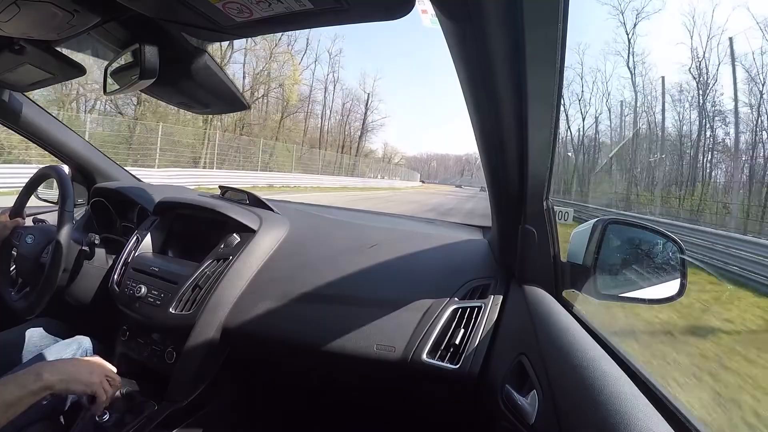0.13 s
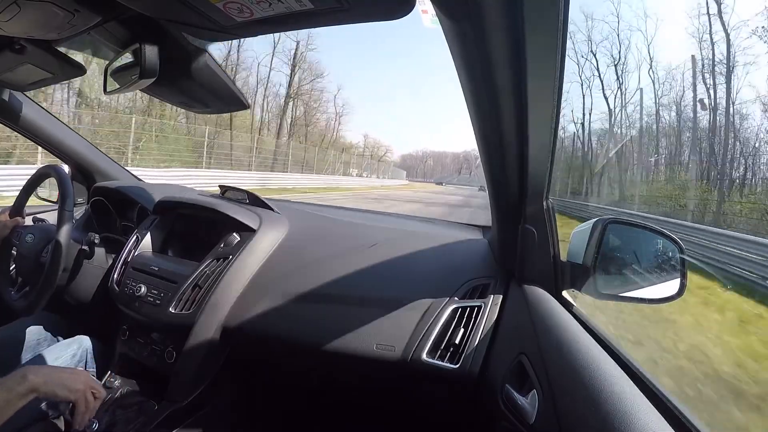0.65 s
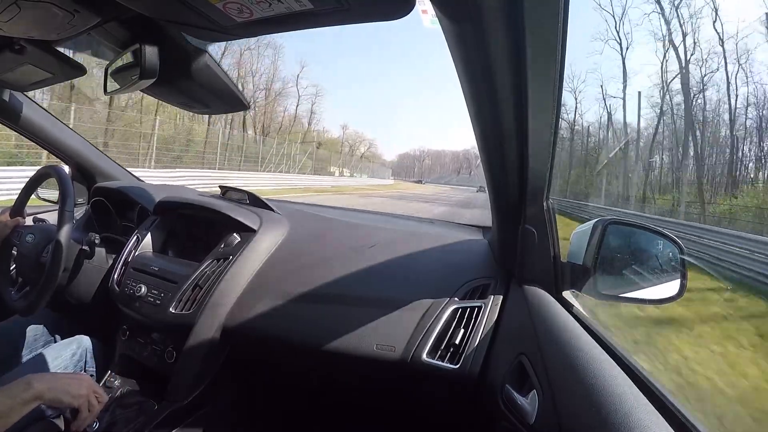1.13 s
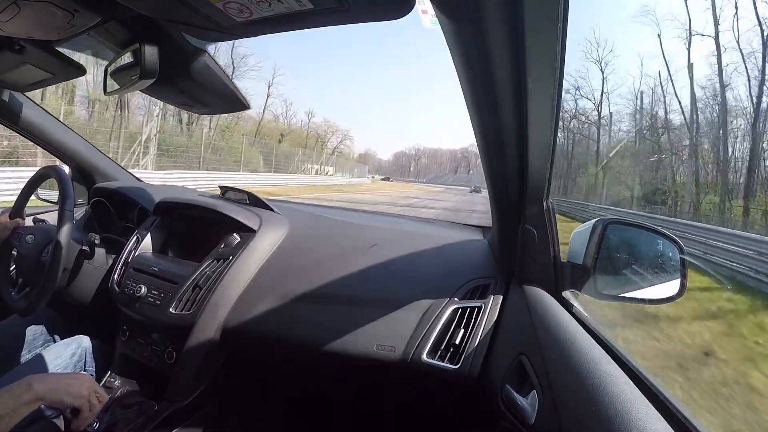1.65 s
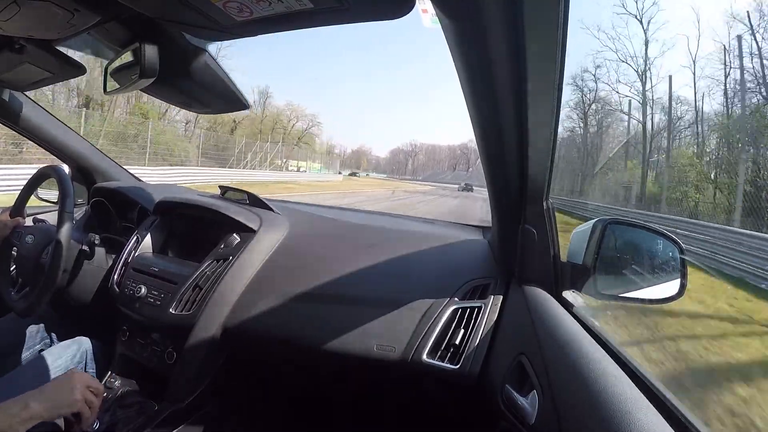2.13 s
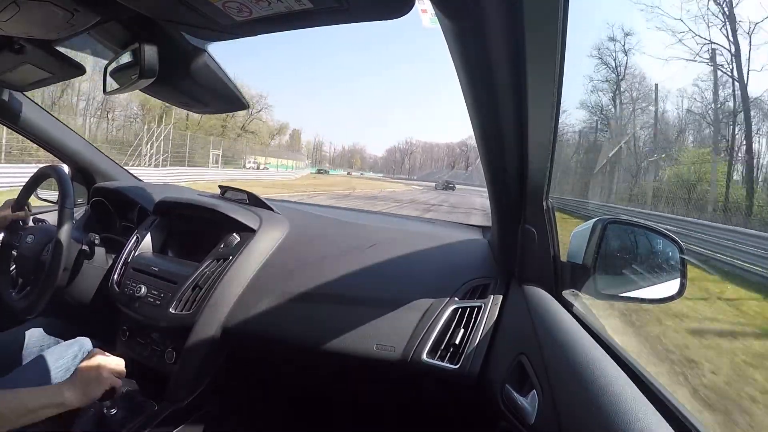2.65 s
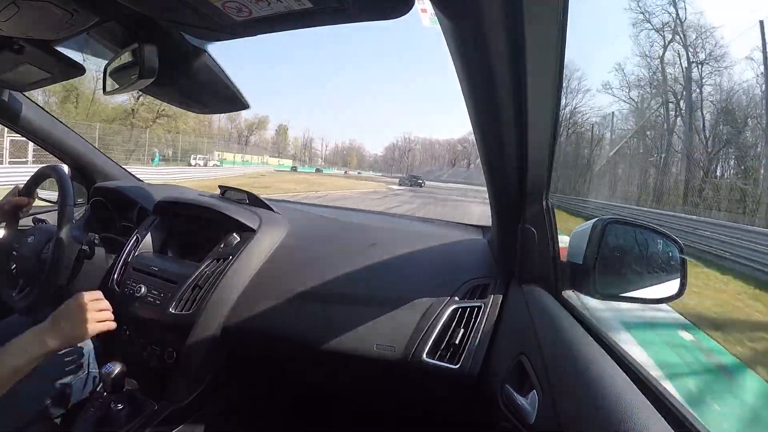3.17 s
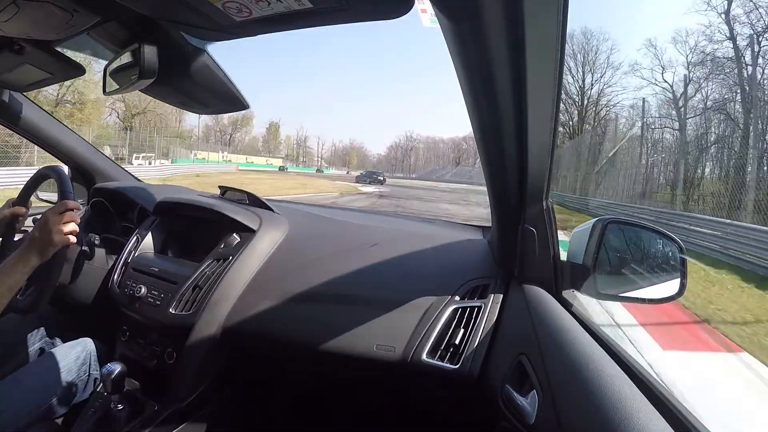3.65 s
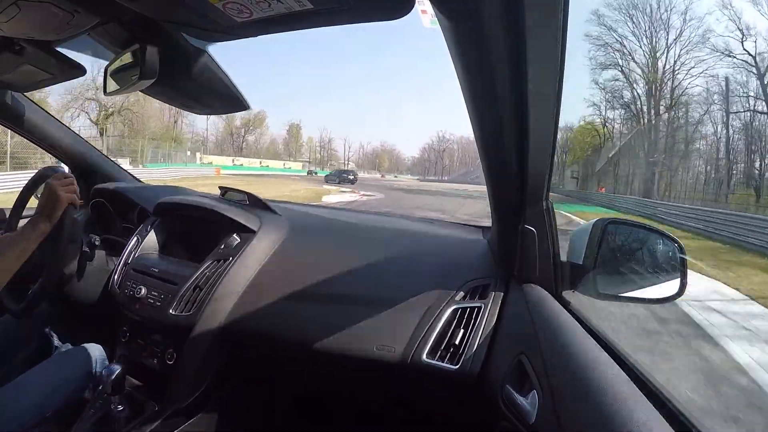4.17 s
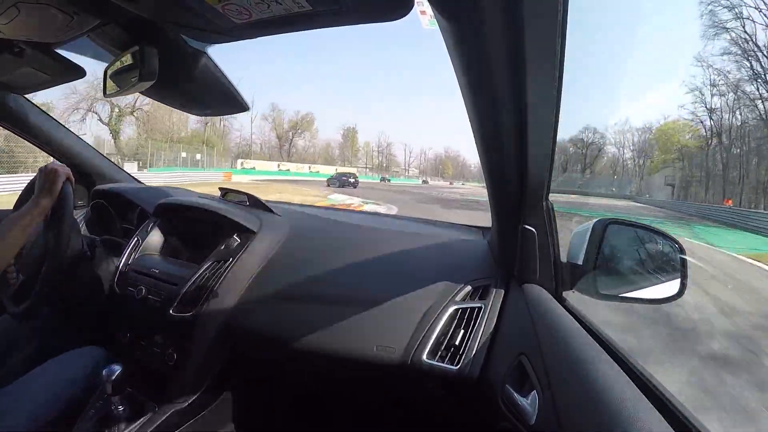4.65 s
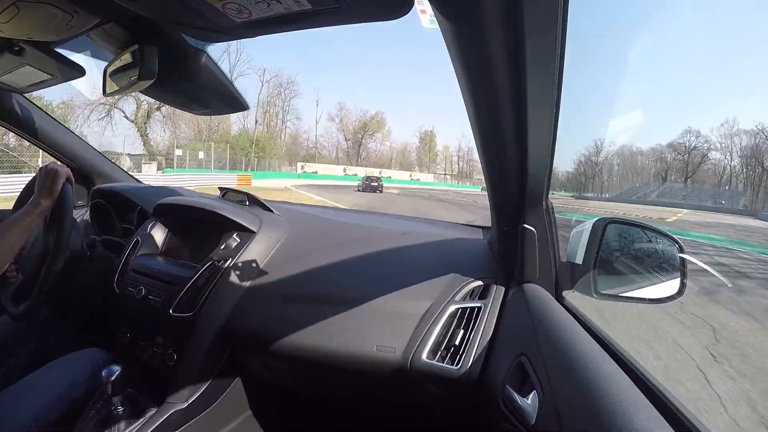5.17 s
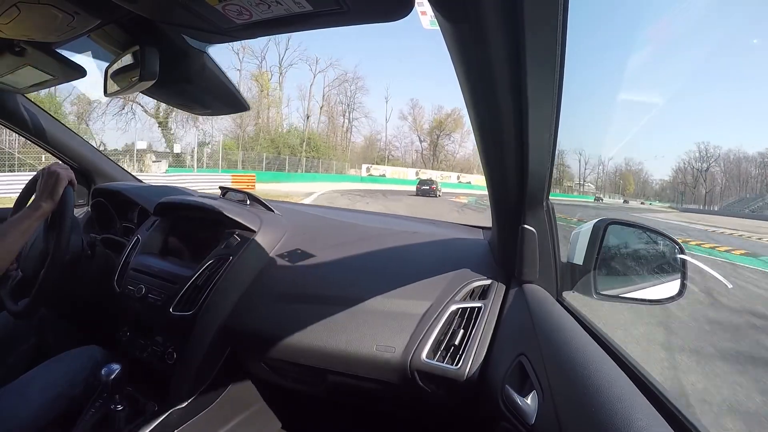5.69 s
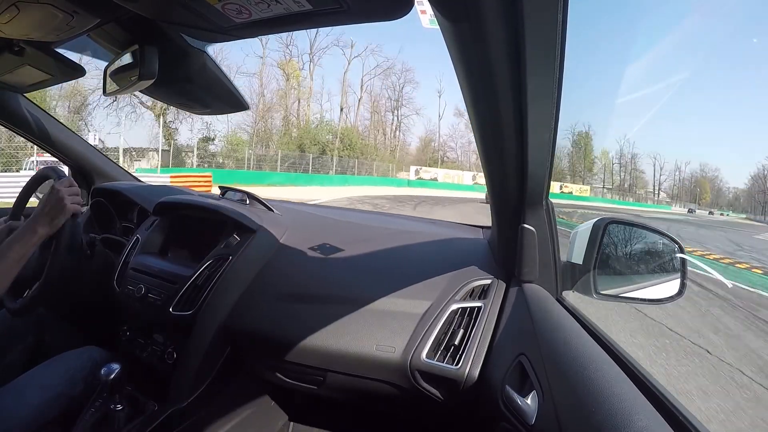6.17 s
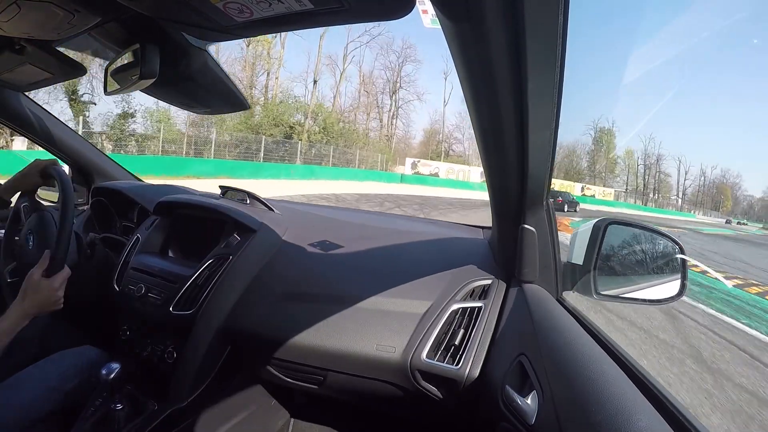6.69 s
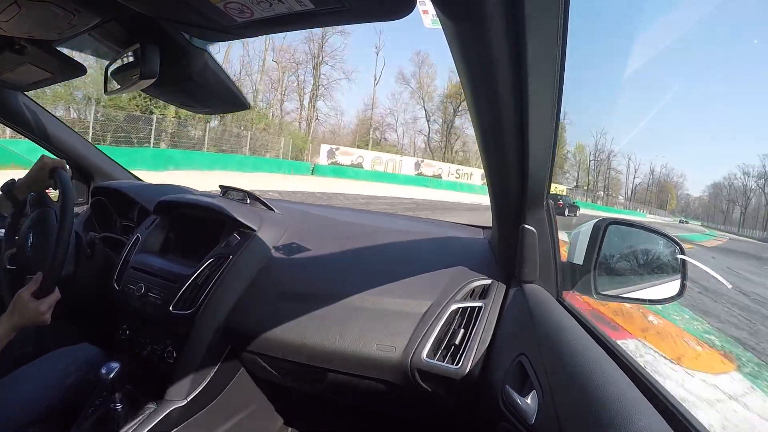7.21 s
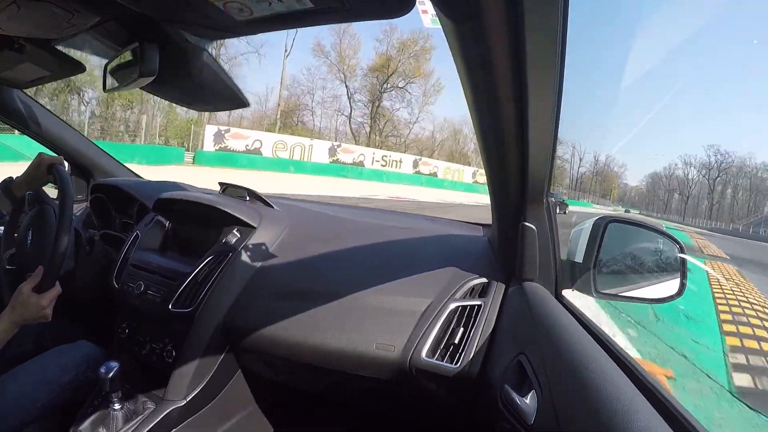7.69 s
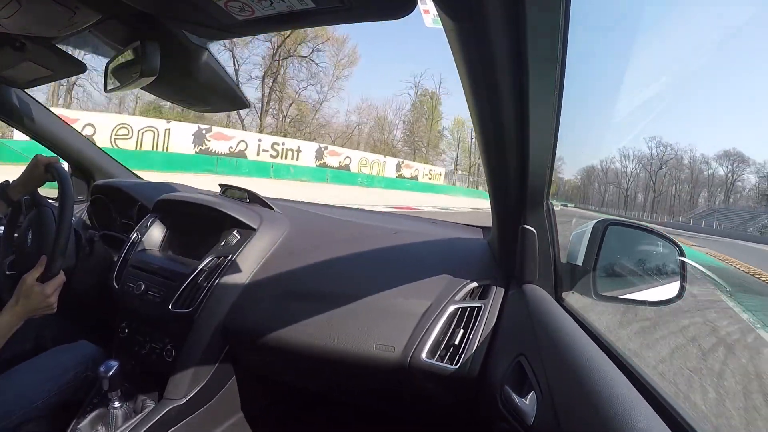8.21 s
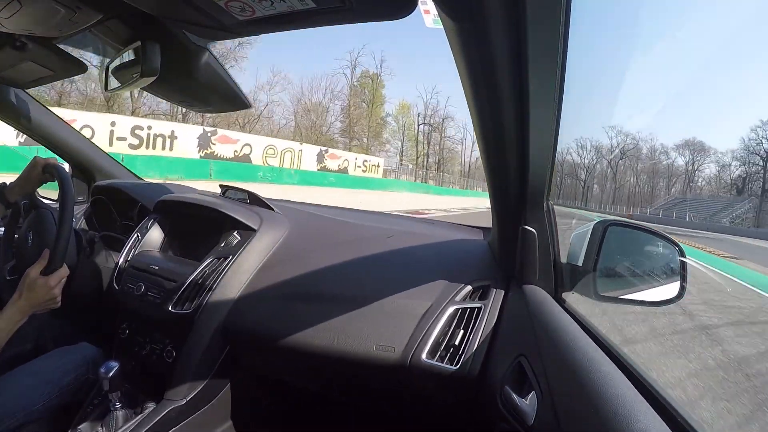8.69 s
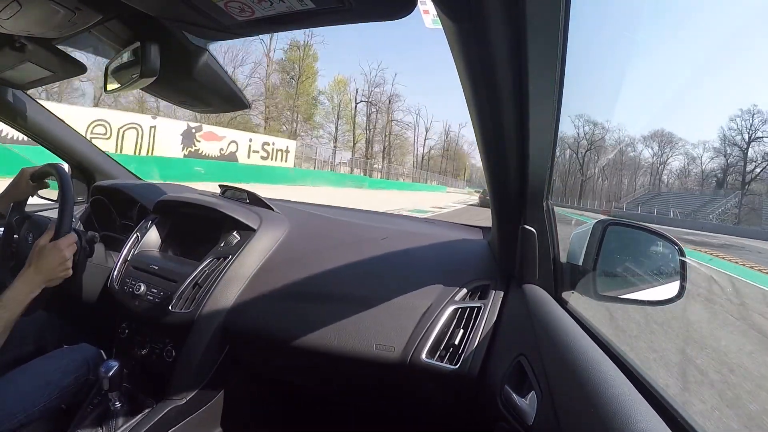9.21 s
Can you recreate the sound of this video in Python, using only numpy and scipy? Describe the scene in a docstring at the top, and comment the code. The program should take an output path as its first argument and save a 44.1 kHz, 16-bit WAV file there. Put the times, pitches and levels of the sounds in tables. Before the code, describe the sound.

Inside a speeding car, a low engine drone sags under braking amid booming road rumble, then kerb thumps, rattling trim and a swelling growl.

```python
"""Inside the cabin of a car that brakes, shifts down twice, rides the kerbs of a chicane and accelerates away.
The four-cylinder engine is a firing tone with overtones that open under throttle; a few hums waver beside it.
Road and wind are bands of shaped noise: the body shakes and booms, tyres roar, wind hisses, treble sizzles.
Kerbs set decaying body tones swinging, and short noise knocks ring the trim through resonant filters."""
import sys
import numpy as np
from scipy import signal
from scipy.fft import rfft, irfft, next_fast_len
from scipy.io import wavfile
from scipy.ndimage import uniform_filter1d

SR = 44100
rng = np.random.default_rng(int(sys.argv[2]) if len(sys.argv) > 2 else 0)


def field_ratio(decibels):
    """Amplitude ratio for a level in dB (20 dB per decade); scalars and array-likes work."""
    return 10 ** (np.asarray(decibels, dtype=float) / 20)


def to_wav(sig):
    """Store sig (one row per channel, or 1-D mono) as 16-bit WAV at the path in sys.argv[1].

    Samples outside -1..1 are clipped; the rate is SR.
    """
    pcm = np.clip(np.atleast_2d(sig), -1, 1) * 32767
    pcm = np.round(pcm).astype(np.int16)
    wavfile.write(sys.argv[1], SR, pcm.T)  # frames by channels


N = 411453


def in_time(rows):
    """Columns of a table whose rows start with seconds, joined by straight lines at every sample."""
    s, *columns = np.transpose(rows)
    return [np.interp(np.arange(N) / SR, s, column) for column in columns]


def rms_one(x):
    """Scales to rms 1."""
    return x / np.sqrt(np.mean(x ** 2) + 1e-20)


def drift(rate):
    """Slow random wandering of spread 1: noise through a double one-pole low-pass at rate Hz."""
    step = 40   # samples between drawn points
    r = np.exp(-2 * np.pi * rate * step / SR)
    noise = rng.standard_normal(N // step + 2002)
    slow = signal.lfilter([1], [1, -2 * r, r * r], noise)[2000:]   # drop the filter's start
    return np.interp(np.arange(N) / step, np.arange(len(slow)), rms_one(slow))


def resonances(x, peaks):
    """Parallel two-pole resonances with alternating signs; peaks are (Hz, width in Hz, level in dB)."""
    out = 0
    for k, (hz, width_hz, level_db) in enumerate(peaks):
        r = np.exp(-np.pi * width_hz / SR)
        a = [1, -2 * r * np.cos(2 * np.pi * hz / SR), r * r]
        b = [(1 - r * r) / 2, 0, (r * r - 1) / 2]
        out = out + (-1) ** k * field_ratio(level_db) * signal.lfilter(b, a, x)
    return out


THROTTLE_OPENS_S = 8.08


def rise(shut_db, open_db, rise_s):
    """A level that settles exponentially from shut to open once the throttle opens."""
    since = np.maximum(np.arange(N) / SR - THROTTLE_OPENS_S, 0)
    return open_db + (shut_db - open_db) * np.exp(-since / rise_s)


# The engine's course. Each row: time in seconds, firings per second, firing tone in dB.
ENGINE_COURSE = [(0, 115, -27), (.36, 102, -27), (.9, 85, -26), (1.2, 91, -20), (1.53, 112, -25),
                 (1.7, 120, -22.5), (2.5, 111.5, -21.5), (2.8, 103, -22), (3.15, 93.5, -18.5),
                 (3.55, 88, -22), (3.75, 100, -32), (3.92, 109, -25), (4.57, 96, -20), (5.3, 93, -23),
                 (5.6, 92, -32), (6.3, 91, -32), (6.6, 91, -22), (7.8, 89, -23), (8.1, 91.8, -36),
                 (8.31, 93.8, -30), (8.89, 99.8, -16), (9.33, 104.7, -17)]
# Overtones that open with the throttle. Each row: multiple of the firing rate, relative level in dB.
EXHAUST_ORDERS = [(.25, 0), (.5, 4), (1.25, 2), (2, 0), (3, -8)]
# Overtones that come with boost. Each row: multiple of the firing rate, relative level in dB.
BOOST_ORDERS = [(1.75, -13), (2.75, -1), (3, -6), (3.75, -15), (4, -13), (4.25, -13), (5, -12), (6, -23),
                (7, -39)]
# Overtones that hum at any load. Each row: multiple of the firing rate, level in dB.
STEADY_ORDERS = [(3.25, -39), (4, -37.5)]
# How the exhaust overtones open: level with throttle shut in dB, level when open in dB, rise time in seconds.
EXHAUST_RISE = (-48, -26.5, .22)
# How the boost overtones open: level with throttle shut in dB, level when open in dB, rise time in seconds.
BOOST_RISE = (-56, -9, .85)


def engine():
    """The firing tone always; uneven cylinders and pipe pulses add quarter orders with throttle and boost."""
    firings, tone_db = in_time(ENGINE_COURSE)
    exhaust_db, boost_db = rise(*EXHAUST_RISE), rise(*BOOST_RISE)
    overrun = np.clip((-36 - exhaust_db) / 8, 0, 1)   # 1 with the throttle shut, 0 when open
    wander = 1 + (.002 + .005 * overrun) * drift(8)
    phase = 2 * np.pi * np.cumsum(firings * wander) / SR
    waver_db = 1.5 * overrun * drift(9.8)   # the firing tone wavers in level off throttle only
    out = np.sin(phase) * field_ratio(tone_db + waver_db)
    steady_db = -5 * overrun   # a little weaker on the overrun
    groups = ((EXHAUST_ORDERS, exhaust_db), (BOOST_ORDERS, boost_db), (STEADY_ORDERS, steady_db))
    for orders, load_db in groups:
        for multiple, level_db in orders:
            level = field_ratio(load_db + level_db + 1.7 * drift(6))
            out += level * np.sin(multiple * phase + multiple ** 2)   # the square scatters the phases
    return np.sqrt(2) * out   # levels count as rms


# Resonances of cabin and microphone housing. Each row: centre in Hz, width in Hz, lift in dB (negative dips).
CABIN = [(26.8, 39, 5), (129, 31, 7), (177.2, 16, 4.5), (232, 23, -9.5), (1088, 30, 4.5), (2056, 85, 6),
         (2670, 120, 2), (4910, 230, 3), (5430, 130, 4.5)]


def cabin_noise(spectrum, flicker_db, rate, edge_db):
    """Noise of a given spectrum, coloured by the cabin and flickering; edge_db is its fall per octave; rms 1."""
    size = next_fast_len(N)
    hz = np.arange(1, size // 2 + 2) * SR / size
    at, level_db = np.transpose(spectrum)
    shape_db = np.interp(np.log(hz), np.log(at), level_db)
    outside = np.maximum(np.log2(at[0] / hz), 0) + np.maximum(np.log2(hz / at[-1]), 0)   # octaves past the ends
    shape_db -= edge_db * outside
    for centre_hz, width_hz, lift_db in CABIN:
        shape_db += lift_db / (1 + (2 * (hz - centre_hz) / width_hz) ** 2)
    noise = irfft(rfft(rng.standard_normal(size)) * field_ratio(shape_db), size)[:N]
    return rms_one(noise * field_ratio(flicker_db * drift(rate)))


def steadied(x, share):
    """Evens out the swells of a narrow noise, as in a body that keeps swinging; rms 1."""
    swell = np.sqrt(uniform_filter1d(x ** 2, size=3000) + .02)
    return rms_one(x / swell ** share)


def patchy(x, edges_hz, flicker_db, rate):
    """Splits a hiss into bands that flicker quickly, partly in step."""
    spectrum, hz = rfft(x), np.arange(N // 2 + 1) * SR / N
    together = drift(rate)
    out = 0
    for low, high in zip(edges_hz, edges_hz[1:]):
        band = irfft(spectrum * (hz >= low) * (hz < high), N)
        out = out + band * field_ratio(flicker_db * (drift(rate) + 0.48 * together))
    return out


# Road and air. Each row: time in seconds, then wind hiss, tyre roar, body shake and floor boom, all in dB.
ROAD = [(0.03, -51, -25, -17, -19), (0.26, -51, -25.5, -19, -19.5), (0.36, -50, -25, -12.5, -18.5),
        (0.73, -52, -26.5, -17, -20.5), (2.25, -54, -25, -15, -22), (2.77, -54, -26, -14, -21),
        (2.79, -54.5, -26, -18, -17.5), (3.59, -58.5, -27.5, -15.5, -24), (4.13, -59, -28.5, -14, -21),
        (4.21, -64, -33, -22.5, -22.5), (4.62, -61, -28.5, -14, -20.5), (4.86, -60, -26, -18, -19.5),
        (5.11, -62, -32, -17, -27), (5.68, -63, -31.5, -16.5, -20), (6.46, -59, -29, -17, -23.5),
        (6.98, -53.5, -24.5, -11.5, -22.5), (7.18, -57.5, -30.5, -16.5, -23),
        (7.41, -57.5, -26, -13.5, -23.5), (7.75, -51.5, -23, -12.5, -14), (7.95, -59, -33.5, -17.5, -28.5),
        (8.24, -69, -39.5, -24.5, -32), (8.55, -62, -32.5, -18.5, -21.5), (9.07, -57.5, -30, -18.5, -39),
        (9.3, -59.5, -36.5, -15.5, -22)]
# The treble sizzle: mean level in dB, share of the wind's swing, share of the roar's swing.
SIZZLE_FOLLOWS = (-74.5, .1, 0.92)


def sizzle_level():
    """Level in dB of the treble sizzle, which swings with wind and tyre roar."""
    mean_db, wind_share, roar_share = SIZZLE_FOLLOWS
    wind_db, roar_db = in_time(ROAD)[:2]
    return mean_db + wind_share * (wind_db - wind_db.mean()) + roar_share * (roar_db - roar_db.mean())


# Level of the road hiss. Each row: time in seconds, level in dB.
ROAD_HISS_LEVEL = [(0.03, -43.5), (0.83, -45.5), (2.53, -45), (2.77, -44), (4.34, -51), (4.7, -50.5),
                   (5.3, -54.5), (6.15, -53), (6.56, -49), (7.72, -48.5), (8.01, -60.5), (8.45, -59),
                   (8.96, -51), (9.3, -50.5)]
# Uneven asphalt jolts the car: jolt rate per second, then swing of shake, boom, roar, hisses and sizzle in dB.
JOLTS = (10, 2.08, 0.9, 0.58, 0.35, 1.3)
# Spectrum of the body shake. Each row: frequency in Hz, relative level in dB per Hz.
SHAKE = [(4.7, -31), (8.0, -6.5), (32, 0), (43, 0), (65, -15), (75, -9), (98, -30), (160, -120)]
# Spectrum of the floor boom. Each row: frequency in Hz, relative level in dB per Hz.
BOOM = [(35, -42), (60, -15.5), (102, 0.5), (126, -9.5), (150, -9.5), (181, -7), (230, -5), (300, -28.5),
        (510, -120)]
# Spectrum of the tyre roar. Each row: frequency in Hz, relative level in dB per Hz.
ROAR = [(120, -27), (200, -17.5), (221, 2.5), (366, -3.5), (433, -5.5), (469, -5), (552, -11), (733, -27),
        (800, -43), (1040, -62.5), (1760, -120)]
# Spectrum of the road hiss. Each row: frequency in Hz, relative level in dB per Hz.
ROAD_HISS = [(410, -25.5), (700, -7), (767, 4.5), (1080, 2), (1320, -6), (1500, -6), (1900, -14.5),
             (2470, -42.5), (4180, -120)]
# Spectrum of the wind hiss. Each row: frequency in Hz, relative level in dB per Hz.
WIND_HISS = [(1000, -44), (1700, -15), (1890, -5), (2050, -5.5), (2220, -3), (2430, 0), (3840, -12.5),
             (4840, -12), (5490, -13.5), (5960, -14.5), (9000, -28.5), (11700, -47.5), (19800, -120)]
# Spectrum of the treble sizzle. Each row: frequency in Hz, relative level in dB per Hz.
SIZZLE = [(4710, -31.5), (8000, -2), (8760, -2.5), (11600, -3.5), (13400, -5.5), (14400, -4.5),
          (15200, -11)]


def road_and_wind():
    """Bands of rolling and air noise, from body shake up to wind hiss, and the patchy treble sizzle."""
    wind_db, roar_db, shake_db, boom_db = in_time(ROAD)
    road_hiss_db, = in_time(ROAD_HISS_LEVEL)
    rate, shake_swing, boom_swing, roar_swing, hiss_swing, sizzle_swing = JOLTS
    jolt = drift(rate)   # shared by all bands but the boom

    shake = steadied(cabin_noise(SHAKE, flicker_db=-2.0, rate=2.1, edge_db=26.5), share=1.0)
    boom = steadied(cabin_noise(BOOM, flicker_db=-0.86, rate=10.0, edge_db=36.0), share=0.36)
    roar = cabin_noise(ROAR, flicker_db=0.08, rate=90, edge_db=45.5)
    road_hiss = cabin_noise(ROAD_HISS, flicker_db=0.6, rate=11, edge_db=40.5)
    wind_hiss = cabin_noise(WIND_HISS, flicker_db=0.92, rate=48, edge_db=48.5)
    sizzle = cabin_noise(SIZZLE, flicker_db=1.2, rate=6, edge_db=38)
    sizzle = patchy(sizzle, [0, 9500, 11000, 12500, 14000, SR], flicker_db=2.5, rate=40)

    out = field_ratio(shake_db + shake_swing * jolt) * shake
    out += field_ratio(boom_db + boom_swing * drift(rate)) * boom
    out += field_ratio(roar_db + roar_swing * jolt) * roar
    out += field_ratio(road_hiss_db + hiss_swing * jolt) * road_hiss
    out += field_ratio(wind_db + hiss_swing * jolt) * wind_hiss
    out += field_ratio(sizzle_level() + sizzle_swing * jolt) * sizzle
    return out


# Wheels over kerbs. Each row: start in seconds, strength in dB, Hz that the blow drives most, reach in octaves.
BUMPS = [(4.599, -15, 122, .3), (4.786, -3, 122, .4), (4.981, -4.5, 47, 0.49), (7.631, -7.5, 135, 1.4),
         (7.848, 3, 22.9, .4), (7.85, -13.5, 530, .4)]
# Modes of the body. Each row: frequency in Hz, relative level in dB, time to fall by 60 dB in seconds.
BODY = [(22.6, -6.5, 1), (47, .8, .47), (122, -2, 0.64), (183, -4, 0.23), (332, -3.5, 0.26), (514, -5, 0.1)]


def bumps():
    """Each kerb sets the body modes near its own pitch swinging; the push takes about a cycle to build."""
    out, t = np.zeros(N + SR), np.arange(SR) / SR
    for s, strength_db, drive_hz, reach in BUMPS:
        at = round(s * SR)
        for hz, level_db, t60 in BODY:
            reached_db = strength_db + level_db - 6 * (np.log2(hz / drive_hz) / reach) ** 2
            build = 1 - np.exp(-1.5 * hz * t)
            out[at:at + SR] += np.sin(2 * np.pi * hz * t) * field_ratio(reached_db - 60 * t / t60) * build
    return out[:N]


def burst(strength_db):
    """A knock of loose plastic: a crack that grows with the blow, then noise that dies away."""
    t = np.arange(round(.25 * SR)) / SR
    crack_db = np.clip(1.6 * (strength_db + 40.5), -12, 14)   # dB gained per dB of strength above -40.5
    body = field_ratio(-60 * t / 0.078) * np.minimum(t / 0.003, 1)   # falls 60 dB in 78 ms
    crack = field_ratio(crack_db - 60 * t / 0.008) * np.minimum(t / 0.0014, 1)   # falls 60 dB in 8 ms
    return rng.standard_normal(len(t)) * (body + crack)


# Trim rattles. Each row: start in seconds, strength in dB, dull part and treble part in dB against the strength
# (each before a fixed boost), Hz that the knock drives most.
RATTLES = [(2.614, -50, 7, -23, 5400), (2.9355, -40.5, -11, -24, 6400), (4.0035, -44, -4, -11, 4800),
           (4.795, -35.5, -4.5, -24, 6400), (4.8252, -43, -1, -19, 4800), (4.866, -46, -1, -35, 4800),
           (4.978, -38, -1.5, -11, 5400), (5.122, -41.5, 8.5, -33, 2350), (5.172, -56, -5, -30, 3580),
           (6.575, -46, 0, -16, 4800), (6.782, -50, -15, -29, 4800), (6.823, -49, 14.5, -21, 2350),
           (6.847, -52, 14, -20, 2350), (6.8854, -44, 10, -28, 2350), (7.356, -43, -1, -16, 5400),
           (7.5695, -41, 1, -22, 5400), (7.634, -36, 0, -8, 5400), (7.6474, -39, -2, -15.5, 5400),
           (7.6912, -39, -1, -19, 4800), (7.798, -48.5, 8, -12, 2350), (7.836, -42.5, 0, -18.5, 2350),
           (7.8496, -36.5, -4, -11, 3580), (7.868, -47, 10, -22, 5400), (7.91, -46, 2, -12, 2350),
           (7.955, -47, -4, -10, 6400)]
# What the trim rings with, dull part. Each row: frequency in Hz, width in Hz, level in dB.
TRIM_DULL = [(790, 300, 6), (1070, 280, 4), (1510, 260, -2), (2030, 180, 0), (2530, 300, 0),
             (3700, 400, -14)]
# What the trim rings with, bright part. Each row: frequency in Hz, width in Hz, level in dB.
TRIM_BRIGHT = [(3820, 370, -2), (4850, 480, 4), (5690, 360, -3), (6400, 370, 2), (7900, 1600, -17)]
# What the trim rings with, treble part. Each row: frequency in Hz, width in Hz, level in dB.
TRIM_TREBLE = [(9900, 1100, 0.0022), (13500, 1800, 0.0077)]
# Modes of the trim that each knock picks by its drive pitch.
# Each row: frequency in Hz, width in Hz, level in dB.
TRIM_MODES = [(2350, 300, 11), (3580, 300, 12), (4800, 500, 3.5), (5400, 300, 9.5), (6400, 500, 7)]


def rattles():
    """Knocks that each strike the trim modes anew, and faint random ticks that follow wind and roar."""
    mode_spread_db, reach_octaves = 2, 0.18
    parts, ringing = np.zeros((3, N + SR)), np.zeros(N + SR)   # parts: dull, bright, treble
    for s, strength_db, dull_db, treble_db, drive_hz in RATTLES:
        knock, at = burst(strength_db), round(s * SR)
        end = at + len(knock)
        part_db = strength_db + np.array([[dull_db + 11.0], [3], [treble_db + 1.5]])
        parts[:, at:end] += field_ratio(part_db) * knock
        modes = []
        for hz, width_hz, level_db in TRIM_MODES:
            missed_db = 6 * min((np.log2(hz / drive_hz) / reach_octaves) ** 2, 4.0)   # far modes ring less
            chance_db = mode_spread_db * rng.standard_normal()
            modes.append((hz, width_hz, strength_db + level_db + chance_db - missed_db))
        ringing[at:end] += resonances(knock, modes)

    born = rng.random(N) < 22 * field_ratio(4 * drift(1.5)) / SR   # around 22 ticks per second, in flurries
    sizes = field_ratio(sizzle_level() + 1.5 + 2.5 * np.minimum(rng.exponential(1, N), 3))
    swell = np.hanning(round(0.027 * SR))
    ticks = signal.fftconvolve(born * sizes, swell)[:N] * rng.standard_normal(N)
    dull, bright, treble = parts[:, :N] + ticks * np.array([[3], [3], [.9]]) + 1e-18
    trim = resonances(dull, TRIM_DULL) + resonances(bright, TRIM_BRIGHT) + resonances(treble, TRIM_TREBLE)
    return trim + ringing[:N]


# Wavering hums that follow neither engine nor cabin, one list of rows for each hum.
# Each row: time in seconds, frequency in Hz, level in dB.
HUMS = [
    [(2.9, 124.5, -46), (3.1, 122.6, -30), (3.7, 118.7, -27), (3.95, 111, -24.5)],
    [(3.2, 151.4, -34), (3.4, 153.5, -39.5), (4.4, 161.6, -36), (5.3, 167.1, -35.5), (5.5, 172, -22.5),
     (5.7, 177, -55)],
    [(3.9, 234.7, -40), (4.4, 232, -30), (5.0, 225.6, -45.5), (5.6, 228, -33), (6.3, 230.3, -57)],
    [(6.0, 1047, -85), (6.3, 1047, -57), (6.8, 1090, -53.5), (7.0, 1114, -70)],
]


def hums():
    """Each hum is a tone that wavers in pitch and level and is silent outside its span."""
    out, t = 0, np.arange(N) / SR
    for rows in HUMS:
        hz, level_db = in_time(rows)
        phase = 2 * np.pi * np.cumsum(hz * (1 + .012 * drift(8))) / SR
        inside_s = np.minimum(t - rows[0][0], rows[-1][0] - t)
        fade = np.clip(inside_s / 0.032, 0, 1)   # 32 ms in and out
        out = out + fade * field_ratio(level_db + 2.7 * drift(6.9)) * np.sin(phase)
    return np.sqrt(2) * out   # levels count as rms


def scene():
    """All sources at the microphone by the passenger seat, as one channel."""
    return (engine() + road_and_wind() + bumps() + rattles() + hums())[None]


def limiter(x, ceiling_db, release_db_s, attack_s):
    """Turns the gain down where peaks pass the ceiling and lets it climb back."""
    ramp = release_db_s * np.arange(N) / SR
    over_db = np.maximum(20 * np.log10(np.abs(x) + 1e-9) - ceiling_db, 0)
    held_db = np.maximum.accumulate(over_db + ramp) - ramp   # jumps up, then falls steadily
    r = np.exp(-1 / (attack_s * SR))
    return x * field_ratio(-signal.lfilter([1 - r], [1, -r], held_db))


def roll_off(x):
    """The treble ends steeply here."""
    return signal.sosfilt(signal.butter(12, 15340, fs=SR, output="sos"), x)


def record(dry):
    """Gain control rides the big low swings, peaks are rounded and the top is cut."""
    even = limiter(dry[0], ceiling_db=-2.5, release_db_s=27.5, attack_s=0.0013)[None]
    top = 4.2   # amplitude that the rounding approaches
    rounded = top * np.tanh(even / top)
    low_pass = signal.cheby2(12, 40, 15500, fs=SR, output="sos")
    return roll_off(signal.sosfilt(low_pass, rounded))


dry = scene()
out = record(dry)
to_wav(out)
```